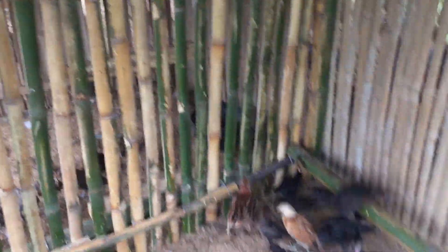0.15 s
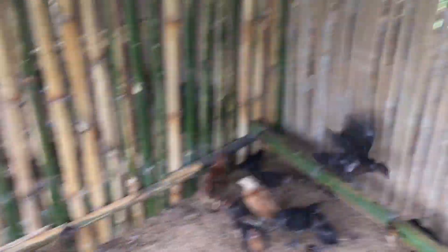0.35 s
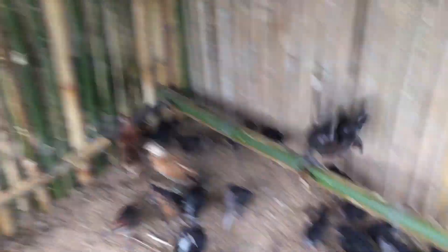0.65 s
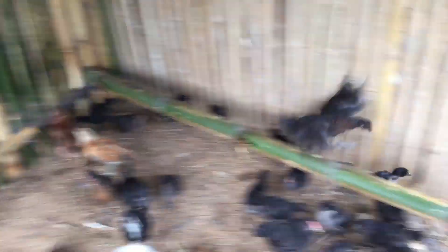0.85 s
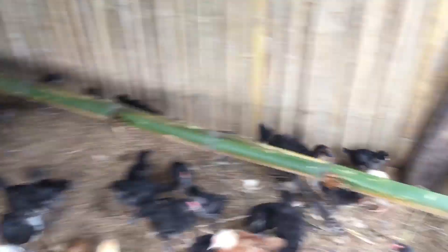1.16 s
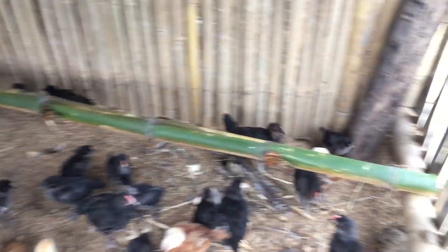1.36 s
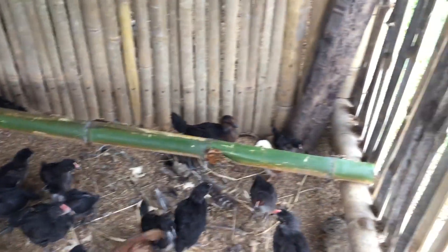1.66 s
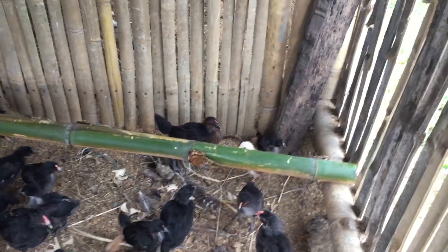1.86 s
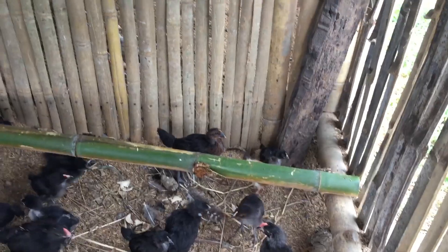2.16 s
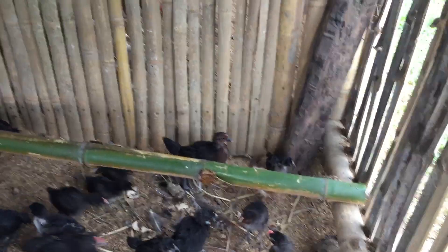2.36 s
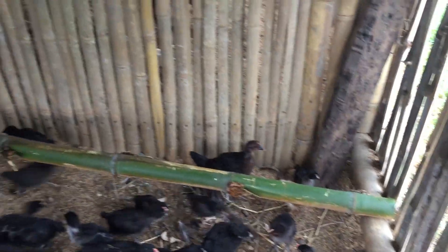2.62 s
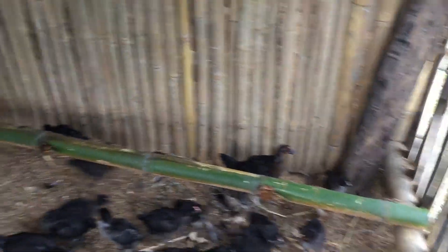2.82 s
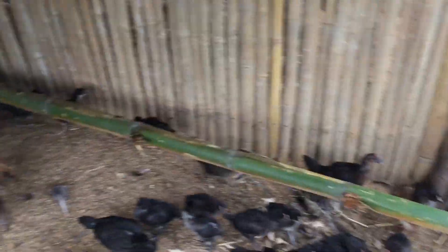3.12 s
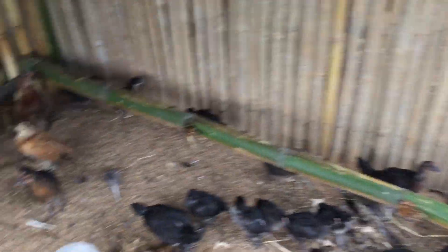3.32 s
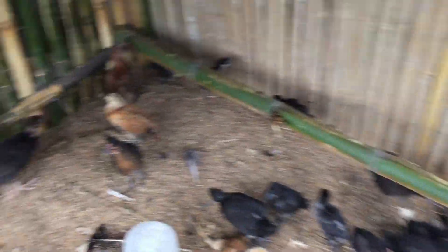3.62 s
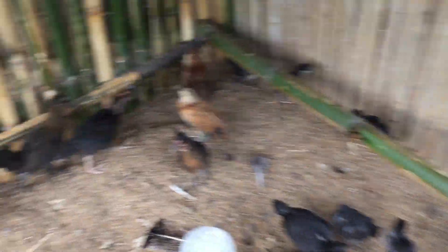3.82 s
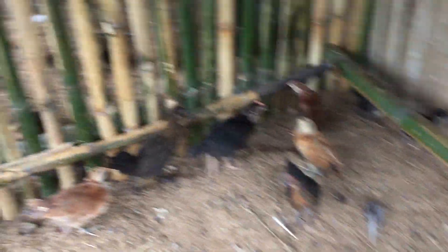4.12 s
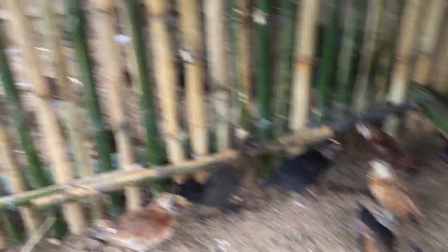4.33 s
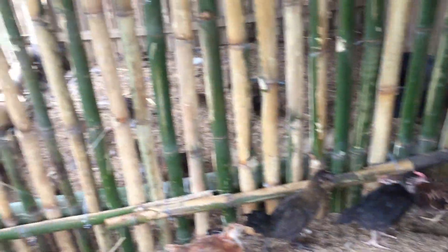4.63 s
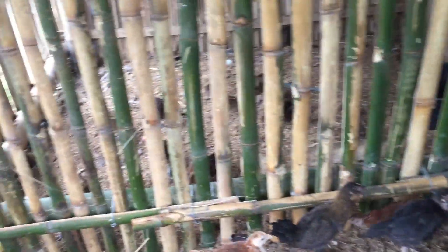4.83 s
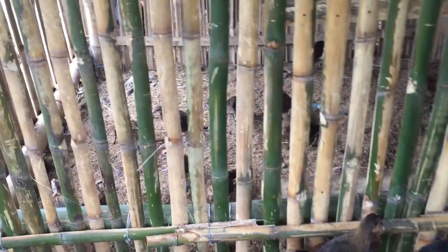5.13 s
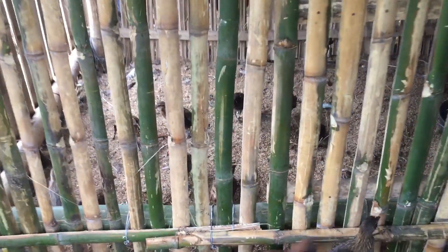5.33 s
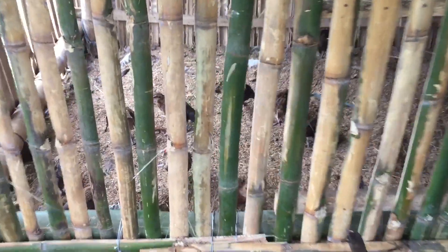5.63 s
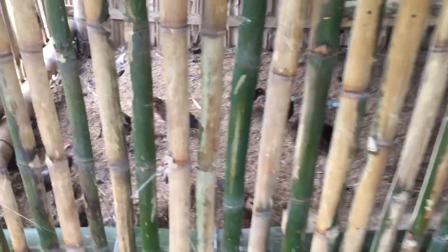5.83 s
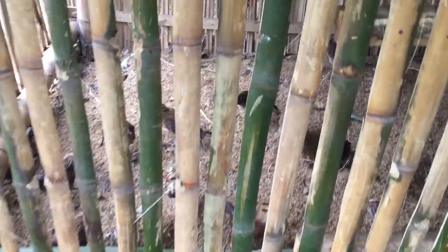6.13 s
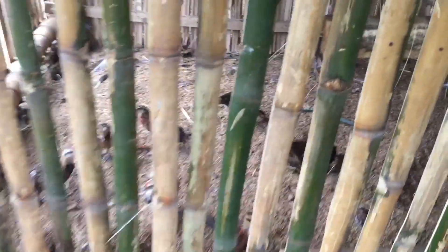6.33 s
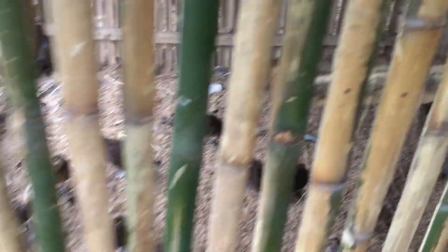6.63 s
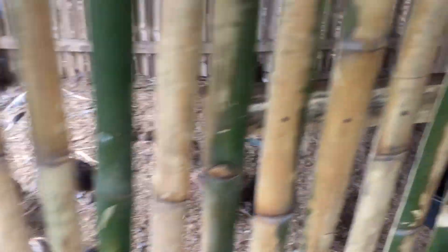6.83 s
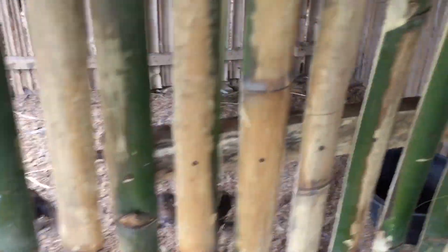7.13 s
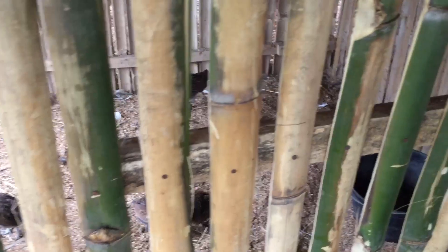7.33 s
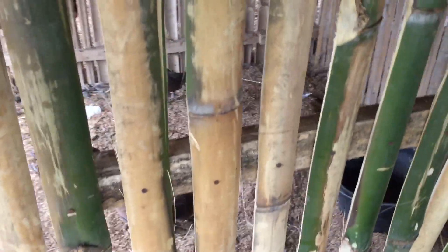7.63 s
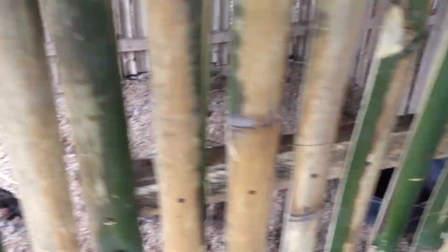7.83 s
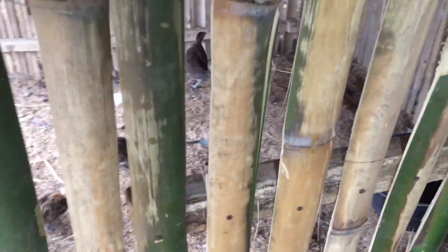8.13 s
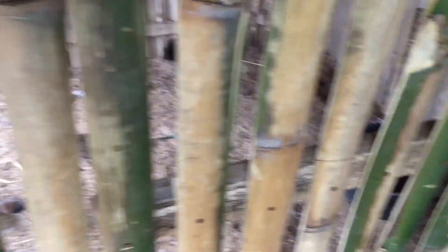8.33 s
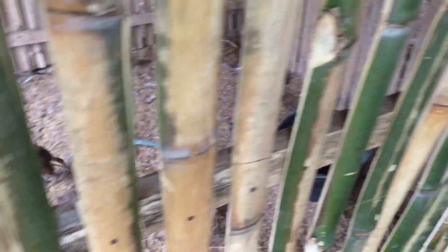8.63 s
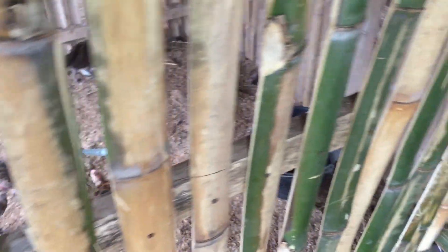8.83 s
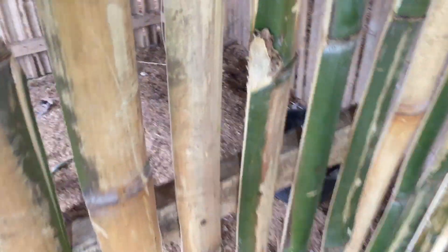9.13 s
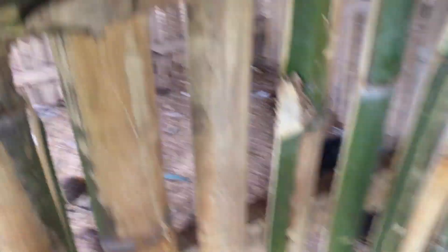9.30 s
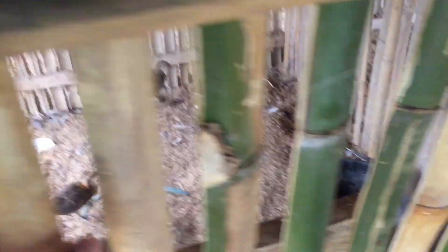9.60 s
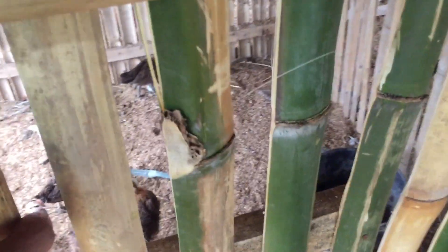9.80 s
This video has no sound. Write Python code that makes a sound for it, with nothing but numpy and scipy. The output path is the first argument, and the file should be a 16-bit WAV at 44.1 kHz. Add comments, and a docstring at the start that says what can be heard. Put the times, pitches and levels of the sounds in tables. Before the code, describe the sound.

Dense overlapping chick peeps, an early wing flutter with dry bamboo knocks, soft hen clucks and whine, then a raspy squawk that hushes the brood.

```python
"""A brood of chicks peeps in a bamboo coop with only brief pauses, over a low rumble and a thin hiss.
At the start one bird flutters down in puffs of noise; claws and beaks knock on bamboo, litter crackles.
Hens murmur, whine and cluck along: buzzing harmonics shaped by a throat, or one thin line.
From about 8.7 s a hen gives a long hoarse squawk, a clear tone with a rattling rasp, and the brood hushes.
Each peep is a near-pure whistle that falls in pitch; two loud ones end with a low blip at half pitch."""
import sys
import numpy as np
from scipy import signal
from scipy.fft import rfft, irfft, next_fast_len
from scipy.io import wavfile
from scipy.ndimage import uniform_filter1d, map_coordinates

SR = 44100
rng = np.random.default_rng(int(sys.argv[2]) if len(sys.argv) > 2 else 0)


def store_pcm(level_fs):
    """Save levels as 16-bit WAV."""
    pcm = np.round(np.clip(level_fs, -1, 1) * 32767).astype(np.int16)
    wavfile.write(sys.argv[1], SR, np.atleast_2d(pcm).T)


N = 439236
TIME = np.arange(N) / SR


def from_db(db):
    """Turn decibels into a plain multiplier."""
    return 10 ** (np.asarray(db) / 20)


def rms_one(x):
    """Scale a sound to an average strength (rms) of 1."""
    return x / np.sqrt(np.mean(x ** 2) + 1e-20)


def in_time(rows):
    """Columns of a curve, read at every sample."""
    s, *columns = np.transpose(rows)
    return [np.interp(TIME, s, c) for c in columns]


def during(rows, fade):
    """One inside the time span of a curve, fading at both ends over fade seconds."""
    return np.clip(np.minimum(TIME - rows[0][0], rows[-1][0] - TIME) / fade, 0, 1)


def add(out, s, sound):
    """Mix a sound in at time s."""
    at = int(np.clip(s * SR, 0, N))
    out[at:at + len(sound)] += sound[:N - at]


def drift(rate, size):
    """Smooth random wandering with spread about 1: rate random points a second, joined by lines."""
    at = np.arange(size) * rate / SR
    points = rng.standard_normal(int(at[-1]) + 3)
    return map_coordinates(points, [at + rng.random()], order=1, mode="nearest") * np.sqrt(3 / 2)


def colour(x, spectrum):
    """Shape a sound by (frequency [Hz], level [dB]) points, falling steeply beyond both ends; rms 1."""
    size = next_fast_len(len(x))
    octave = np.log2(np.arange(size // 2 + 1) * SR / size + 1)
    hz, db = np.transpose(spectrum)
    outside = np.abs(octave - np.clip(octave, np.log2(hz[0]), np.log2(hz[-1])))
    gain_db = np.interp(octave, np.log2(hz), db) - 98 * outside  # 98 dB per octave beyond the ends
    return rms_one(irfft(rfft(x, size) * from_db(gain_db), size)[:len(x)])


def noise(spectrum, size):
    """Coloured noise, rms 1."""
    return colour(rng.standard_normal(size), spectrum)


def phase_of(hz):
    """Add up a changing frequency into the phase of a wave."""
    return 2 * np.pi * np.cumsum(hz) / SR


def swell(u, top):
    """Rises to its height at share top of a note, then falls; rms 1."""
    return rms_one(np.sin(np.pi * np.interp(u, [0, np.clip(top, .08, .92), 1], [0, .5, 1])))


def coop(x, echo_db, tail_db, t60=0.26, count=8):
    """A few early echoes from the ground and slats, then a short scattered tail."""
    t = TIME[:SR // 2]
    echoes = np.zeros(len(t))
    echo_at = (rng.uniform(.002, .022, count) * SR).astype(int)
    echoes[echo_at] = rng.choice([-1, 1], count) / np.sqrt(count)
    tail = rng.standard_normal(len(t)) * from_db(-60 * t / t60) * np.clip(t / 0.0016, 0, 1)
    response = from_db(echo_db) * echoes + from_db(tail_db) * tail / np.linalg.norm(tail)
    return x + signal.fftconvolve(x, response)[:N]


def background():
    """Low rumble with a wavering hum, broad hiss that comes and goes, and a narrow hiss high up."""
    # sound colour of the rumble: (frequency [Hz], level [dB])
    rumble_colour = [(25, -25), (54, 0), (102, 1.5), (145, -6), (253, -26.5), (420, -37)]
    # strength of the rumble: (time [s], level [dB])
    rumble_db = [(0, -43), (2.1, -47), (3.2, -43.5), (5.7, -47.5), (9.96, -45.5)]
    # sound colour of the broad hiss: (frequency [Hz], level [dB])
    air_colour = [(300,-2.5), (600,3), (1200,0), (2000,-3), (5000,7), (7500,-6), (9500,4.5), (10400,-8),
                  (11300,8), (12500,-2.5), (15700,-5)]
    # rise and fall of the broad hiss, before a 13 dB lift: (time [s], level [dB])
    air_db = [(0,-69), (2.3,-75.5), (5,-73), (7.7,-71.5)]
    # strength of the narrow hiss near 11 kHz: (time [s], level [dB])
    high_db = [(0, -67), (3, -60.5), (4.5, -68), (8, -88)]
    rumble = from_db(in_time(rumble_db)[0]) * noise(rumble_colour, N)
    hum = from_db(-51.5) * np.sin(phase_of(91 + 1.726 * drift(5.2, N)))
    hum = hum * (1 + 0.47 * drift(1.44, N))
    air = from_db(in_time(air_db)[0] + 13 + 2.3 * drift(7, N)) * noise(air_colour, N)
    high_colour = [(10300, -15), (10900, -2), (11250, 5), (11700, -6), (12600, -53)]
    high = from_db(in_time(high_db)[0]) * noise(high_colour, N)
    return rumble + hum + air + high


def litter(patchy_db=-1.0, grain_db=6.0):
    """Many small feet stir the dry litter: a faint crackle that comes and goes."""
    # sound colour of the dry litter: (frequency [Hz], level [dB])
    litter_colour = [(2000,3), (5000,-18), (7000,-6), (9500,3), (15000,-0.5)]
    # how strongly it is stirred: (time [s], level [dB])
    litter_db = [(0,-70), (1.2,-63), (2.4,-75), (3.5,-68), (5.0,-84), (5.9,-66), (7.7,-61), (8.3,-72)]
    grains = rng.standard_normal(N) * from_db(grain_db * drift(600, N))
    patches = from_db(patchy_db * drift(16, N))
    return from_db(in_time(litter_db)[0]) * rms_one(colour(grains, litter_colour) * patches)


def knocks(crack_t60=0.02, ring_t60=0.073, ring_db=-22):
    """Claws and beaks on bamboo: a dry crack with a short woody tail."""
    # the knocks: (time [s], level [dB])
    knock_list = [(0.376,-45), (0.484,-42), (.695,-40), (0.852,-36), (1.055,-29), (1.431,-47),
                  (7.183,-43.5), (9.813,-38)]
    # sound colour of struck bamboo: (frequency [Hz], level [dB])
    bamboo = [(450, -44), (900, 2), (1600, 4), (2400, -2), (4200, 7.5), (6000, 5), (9000, 9), (15000, -3)]
    out, t = np.zeros(N), TIME[:SR // 8]
    for s, db in knock_list:
        decay = from_db(-60 * t / crack_t60) + from_db(ring_db - 60 * t / ring_t60)
        add(out, s, from_db(db) * noise(bamboo, len(t)) * decay)
    return out


def flutter():
    """Wing beats and scuffs: each is a crackly puff of feathers and litter."""
    # wing beats and scuffs in the litter: (time [s], level [dB], length [s])
    flaps = [(0.293, -49, 0.018), (0.485, -47, 0.02), (0.573, -46, 0.048), (0.675, -51, 0.031),
             (0.82, -53, 0.078), (0.906, -45.5, 0.072), (1.075, -48.5, 0.04), (1.229, -53, 0.034)]
    # sound colour of the puffs: (frequency [Hz], level [dB])
    feathers = [(150, 12.5), (400, -2.5), (1000, -7.5), (2000, 0), (5000, -2), (9000, -3.5), (15000, -8)]
    out = np.zeros(N)
    for s, db, length in flaps:
        u = np.linspace(0, 1, int(length * SR))
        grains = rng.standard_normal(len(u)) * from_db(4.6 * drift(694, len(u)))
        add(out, s, from_db(db) * colour(grains, feathers) * swell(u, 0.22))
    return out


def chatter():
    """A far hen's short soft grainy notes, about nine a second, strongest in the second harmonic."""
    # the string of notes: (first time [s], last time [s], pitch [Hz], level [dB])
    note_string = (7.4, 8.7, 505, -62.5)
    first, last, hz, db = note_string
    pulses = np.sin(phase_of(9 + 5 * drift(12, N)))
    notes = np.sqrt(np.maximum(pulses + .5, 0)) * from_db(3 * drift(8, N))
    phase = phase_of(hz * (1 + 0.051 * drift(160, N)))
    voice = np.sin(2 * phase) + from_db(-25) * np.sin(phase) + from_db(-11.5) * np.sin(3 * phase)
    grainy_level = from_db(db + 2.1 * drift(70, N))
    return grainy_level * notes * during([[first], [last]], 0.013) * voice


def syrinx(hz, rough, jitter, rasp, count):
    """Harmonics of an unsteady membrane, with air noise let through on every cycle."""
    phase = phase_of(hz * (1 + jitter * rough * drift(500, len(hz))))
    buzz = rms_one(sum(np.cos(k * phase) for k in range(1, count + 1)))
    air = rng.standard_normal(len(hz)) * (1 + np.cos(phase))
    return buzz + rasp * rough * air


def clucks():
    """Short gruff pops with falling pitch."""
    # the clucks: (time [s], level [dB], length [s], pitch about mid-note [Hz])
    cluck_list = [(3.595,-56,0.037,357), (3.919,-41,0.036,304.6), (4.191,-41.5,0.022,295.7),
                  (4.333,-43,0.022,319.6), (4.495,-49,0.032,322), (4.856,-50.5,0.051,302.6),
                  (8.061,-58,0.03,291), (9.704,-35,0.035,600), (9.803,-50.5,0.094,226.7)]
    # throat with the beak nearly shut: (frequency [Hz], level [dB])
    cluck_throat = [(200, -34.5), (400, -5), (600, 3), (900, -6.5), (1300, -14.5), (2000, -11), (3500, -30)]
    out = np.zeros(N)
    for s, db, length, hz in cluck_list:
        u = np.linspace(0, 1, int(length * SR))
        buzz = syrinx(hz * (1.1 - 0.163 * u), 0.805, jitter=0.106, rasp=2.16, count=10)
        add(out, s, from_db(db) * colour(buzz, cluck_throat) * swell(u, 0.39))
    return out


def whine():
    """A hen's one thin line that shakes in pitch and strength, steadiest where it is loudest."""
    # the held whine, before a 3.5 dB lift: (time [s], pitch [Hz], level [dB])
    whine_line = [(3.35, 1420, -76), (3.5, 1433, -63.5), (4.05, 1398, -56), (4.38, 1454, -54),
                  (4.47, 1487, -46), (4.58, 1488, -42.5), (4.68, 1420, -46.5), (5.04, 1442, -47),
                  (5.12, 1400, -67)]
    hz, db = in_time(whine_line)
    shake = np.interp(TIME, [3.9, 4.5, 4.6, 4.7], [1, .15, .15, .7])
    line = np.sin(phase_of(hz * (1 + .03 * shake * drift(220, N))))
    line = line * from_db(4 * shake * drift(70, N))
    return from_db(db + 3.5) * during(whine_line, 0.029) * line


def murmurs():
    """Quiet, arched, wavering hen notes, clear or gruff and pulsing; also two low blips under peeps."""
    # the notes: (start [s], end [s], start pitch [Hz], end pitch [Hz], level [dB],
    # roughness [0 = clear, about 1 = gruff]);
    # the rows at 5.811 and 6.333 s are no hen: low blips at half pitch as loud peeps end
    murmur_list = [(0.256,0.326,713,686,-50.5,0.9), (0.615,0.636,590,550,-45,0.25),
                   (0.855,0.875,416,396,-47.5,0.54), (1.279,1.5,497,436,-59.5,0.39),
                   (1.452,1.56,569,543,-53.5,0.62), (1.671,1.806,566,508,-55.5,0.67),
                   (1.94,2.04,504,534,-55,1.4), (2.041,2.201,517,550,-50.5,0.58),
                   (2.689,3.092,644,654,-67.5,0.26), (2.823,3.127,442,423,-65,0.24),
                   (3.19,3.22,450,440,-61,.25), (3.269,3.298,460,438,-59,0.37),
                   (3.996,4.059,459,455,-46,0.24), (5.07,5.147,492,423,-42.5,0.25),
                   (5.193,5.31,494,480,-56,1.44), (5.811,5.824,587,495,-53,0),
                   (6.333,6.35,580,526,-59.5,0.1)]
    # throat of a clear note: (frequency [Hz], level [dB])
    clear_throat = [(480,-25), (750,8.5), (1000,17), (1350,-11), (1700,2.5), (2100,-17)]
    # throat of a gruff note: (frequency [Hz], level [dB])
    gruff_throat = [(420,-14), (550,10), (800,6), (1050,11), (1250,13), (1450,11.5), (1700,3), (2000,-24)]
    arch_share, waver_share = 0.029, 0.0162  # mid-note rise and unsteadiness, as shares of the pitch
    pulses_per_s, pulse_db = 47.3, 4.5  # pulse depth is for roughness 1
    out = np.zeros(N)
    for start, end, first_hz, last_hz, db, rough in murmur_list:
        u = np.linspace(0, 1, int(max(end - start, .02) * SR))
        arch = arch_share * (np.sin(np.pi * u) - .5)
        hz = (first_hz + (last_hz - first_hz) * u) * (1 + arch + waver_share * drift(29.2, len(u)))
        buzz = syrinx(hz, rough, jitter=.06, rasp=.8, count=6)
        gruff = np.clip((rough - .3) / .4, 0, 1)
        voice = (1 - gruff) * colour(buzz, clear_throat) + gruff * colour(buzz, gruff_throat)
        pulses = np.sin(phase_of(pulses_per_s * (1 + .3 * drift(40, len(u)))))
        grain = from_db(rough * pulse_db * pulses + 4 * drift(30, len(u)))
        shape = rms_one(np.sqrt(np.abs(swell(u, 0.75))))
        add(out, start, from_db(db) * rms_one(voice * grain) * shape)
    return out


def effort_db(t, start_s, release_s, db, attack, rise_db, tiring, release):
    """Level of the squawk: it sets in, holds while it may slowly tire, and dies away."""
    since = t - start_s
    rise = rise_db * np.maximum(1 - since / attack, 0)
    return db - rise - tiring * since - release * np.maximum(t - release_s, 0)


def squawk():
    """A strong second harmonic over hoarse upper ones that clear, then roughen again at the end."""
    # pitch of the squawk: (time [s], pitch [Hz])
    squawk_pitch = [(8.77, 470), (8.81, 495), (8.85, 545), (8.91, 580), (9.0, 585), (9.15, 560),
                    (9.35, 542), (9.55, 500), (9.72, 425), (9.79, 362)]
    # clear tone: (level [dB], attack [s], rise in the attack [dB], tiring [dB/s], release [dB/s])
    tone_effort = (-27.9, .16, 27, 0, 260)
    # rasp: (level [dB], attack [s], rise in the attack [dB], tiring [dB/s], release [dB/s])
    rasp_effort = (-29.6, .14, 12, 4.5, 170)
    # the voice breaks and leaves mostly rasp: (time [s], half length [s], loss of tone [dB])
    voice_breaks = [(8.897, 0.02, 24), (8.996, 0.03, 6), (9.132, 0.02, 20), (9.243, 0.011, 20),
                    (9.395, .024, 18), (9.55, 0.1, 8.5)]
    # throat with the beak wide open: (frequency [Hz], level [dB])
    open_throat = [(380,-20), (500,-16), (630,9.5), (850,-2.5), (1150,4), (1380,-4), (1700,0), (1900,9.5),
                   (2150,13.5), (2550,-5), (2900,-7.5), (3550,-30), (4000,-12), (5000,-15), (5600,-10.5),
                   (6400,-10), (6950,-18.5), (8500,-18), (15000,-32)]
    # throat with the beak closing: (frequency [Hz], level [dB])
    closing_throat = [(330,-16), (470,3), (620,9.5), (850,2), (1150,5), (1500,0), (1950,1), (2550,-7.5),
                      (2850,-19), (3380,-17), (3800,-13), (4980,-20), (5500,-14.5), (6300,-12.5),
                      (7200,-23), (9800,-24.5), (15000,-28)]
    # the beak closes between: (start [s], end [s])
    beak_closing = (9.01, 9.32)
    start_s, release_s, end_s = 8.695, 9.735, 9.89
    tone_flutter_db, tone_flutter_per_s = 2.8, 45
    rasp_flutter_db, rasp_flutter_per_s = 1.2, 70

    on = during([[start_s], [end_s]], 0.03)
    live, out = on > 0, np.zeros(N)
    hz, t, size = in_time(squawk_pitch)[0][live], TIME[live], live.sum()
    tone_db = effort_db(t, start_s, release_s, *tone_effort)
    tone_db = tone_db + tone_flutter_db * np.tanh(drift(tone_flutter_per_s, size))
    tone_db = tone_db - sum(db * np.exp(-((t - s) / half) ** 2) for s, half, db in voice_breaks)
    rasp_db = effort_db(t, start_s, release_s, *rasp_effort)
    rasp_db = rasp_db + rasp_flutter_db * drift(rasp_flutter_per_s, size)
    rough = np.interp(t, [8.8, 9.35, 9.55, 9.68, 9.73], [1.0, .9, .68, .72, 1.1])
    jitter = rough * (.010 * drift(260, size) + .028 * drift(1500, size))
    phase = phase_of(hz * (1 + jitter))
    # the membrane rattles: every harmonic wanders in strength and phase on its own
    buzz = np.zeros(size)
    for k in range(1, 22):
        strength = min(k / 2, 1) ** 2 * from_db(2.5 * drift(90, size))
        wander = 2 * np.pi * rng.random() + 1.1 * rough * drift(170, size)
        buzz += strength * np.cos(k * phase + wander)
    # strong and weak cycles alternate, filling the gaps between the harmonics
    buzz = rms_one(buzz) * (1 + rough * np.tanh(drift(140, size)) * np.cos(phase / 2))
    source = buzz + .4 * rough * rng.standard_normal(size)  # with rushing air
    # as the beak closes, one throat colour blends into the other
    closing = np.interp(t, beak_closing, [0, 1])
    voice = (1 - closing) * colour(source, open_throat) + closing * colour(source, closing_throat)
    # the push of air is even, however the membrane rattles
    voice = voice / np.sqrt(uniform_filter1d(voice ** 2, size=500) + 1e-9)
    # the part above 7 kHz grows at first, then fades towards the end
    dull = signal.sosfiltfilt(signal.butter(6, 7000, fs=SR, output="sos"), voice)
    voice = dull + (voice - dull) * np.interp(t, [8.75, 8.9, 9.65], [.5, 1.2, .5])
    tone = np.sqrt(2) * np.sin(2 * phase) * from_db(1.3 * drift(90, size))
    out[live] = from_db(tone_db) * tone + from_db(rasp_db) * voice
    return out * on


def brood_gain():
    """The brood calls more or less busily, pauses now and then, and hushes at the squawk."""
    # how busy the brood is: (time [s], level [dB])
    busy = [(0.0, -49.5), (0.55, -54), (0.68, -43.5), (0.97, -49.5), (1.72, -42), (1.87, -54), (2.6, -48),
            (4.1, -41.5), (5.16, -43.5), (5.47, -42.5), (6.08, -44.5), (6.3, -38.5), (7.7, -43.5),
            (8.7, -43.5)]
    # brief pauses: (time [s], half length [s])
    lulls = [(1.383, 0.12), (2.315, 0.2), (5.09, 0.1), (6.394, 0.082), (6.891, 0.045)]
    lull_db, hush_s, hush_db_per_s = 11.5, 8.81, 18
    lull = sum(np.exp(-((TIME - s) / half) ** 2) for s, half in lulls)
    hush = hush_db_per_s * np.maximum(TIME - hush_s, 0)
    return from_db(in_time(busy)[0] - lull_db * lull - hush)


def peep(length, first_hz, last_hz, bend, bright_db):
    """A near-pure whistle that eases in, glides down with small kinks and a quiver, and drops off."""
    # a chick's throat, as it passes the overtones: (frequency [Hz], level [dB])
    overtone_throat = [(4500, -18), (6200, -28), (7400, -33), (9500, -31.5), (11000, -39)]
    hook_share, hook_s = .06, .012  # a peep that hangs first scoops up into its pitch
    drop_share, drop_s = 0.09, 0.00618  # the pitch dips as the peep ends
    wander, wander_per_s = 0.0351, 59.9  # kinks in the glide, as a share of its fall
    quiver_share, flutter_db = 0.0056, 3  # unsteadiness of the pitch and of the strength
    attack_s, release_s = .012, .004
    u = np.linspace(0, 1, int(max(length, .018) * SR))
    t = u * length
    hook = hook_share * np.clip(bend - 1, 0, 1) * np.exp(-t / hook_s)
    drop = drop_share * np.exp((t - length) / drop_s)
    glide = u ** max(bend, .2) + wander * drift(wander_per_s, len(u))
    hz = first_hz * (last_hz / first_hz) ** glide * (1 - hook - drop)
    phase = phase_of(hz * (1 + quiver_share * drift(200.0, len(u))))
    overtones = np.zeros(len(u))
    for k in (2, 3):
        throat_db = np.interp(k * hz, *np.transpose(overtone_throat))
        overtone_db = throat_db + bright_db - 5 * (k - 2) + 4 * drift(35, len(u))
        overtones += from_db(overtone_db) * np.sin(k * phase)
    # loudest three quarters of the way through
    loudness = np.abs(swell(u, 0.75)) ** 0.2 * from_db(flutter_db * drift(147.0, len(u)))
    edges = np.clip(np.minimum(t / attack_s, (length - t) / release_s), 0, 1)
    loudness = loudness * np.sin(np.pi / 2 * edges)
    return rms_one(loudness) * (np.sin(phase) + overtones) * np.sqrt(2)


def thin_peeps(count=56):
    """Softer, higher and longer peeps that cross the others."""
    out = np.zeros(N)
    for k, (when, length, high, low) in enumerate(rng.random((count, 4))):
        call = peep(.07 + .08 * length, 4100 + 750 * high, 2900 + 900 * low, 1.5, bright_db=13.5)
        add(out, (k + when) / count * TIME[-1], call)
    return from_db(-9) * rms_one(out) * brood_gain()


def far_chicks(count=350):
    """The rest of the brood: the same falling peep, at random moments, pitches and strengths."""
    spread_db = 7  # far peeps differ by up to twice this in strength
    out = np.zeros(N)
    for k, (when, length, high, fall, size, bend) in enumerate(rng.random((count, 6))):
        first_hz = 3350 + 1400 * high
        last_hz = 2480 + (first_hz - 2900) * .7 * fall
        call = peep(.024 + .05 * length, first_hz, last_hz, .6 + bend, bright_db=5)
        add(out, (k + when) / count * TIME[-1], from_db(spread_db * 2 * size) * call)
    return rms_one(out) * brood_gain()


def near_chicks():
    """The chicks close by, peep after peep."""
    # the loudest peeps: (time [s], length [s], start pitch [Hz], end pitch [Hz], level [dB],
    # bend [over 1 hangs before it falls, under 1 drops at once])
    peep_list = [(.03,0.054,3890,3210,-42.5,1), (0.049,0.081,4320,3470,-48,1.5),
                 (.14,0.038,4900,4100,-49,1), (.175,0.027,3810,3030,-46,.7), (.187,0.044,4200,3200,-48,.9),
                 (.28,0.028,3190,2380,-49.5,.8), (.35,.13,3600,2690,-52,0.52),
                 (0.406,0.026,3600,3180,-40.5,0.95), (0.485,.11,3550,2730,-40,0.6),
                 (0.616,0.016,2430,2330,-37,0.9), (0.691,0.031,3480,2630,-44.5,0.92),
                 (.68,0.091,4300,3480,-44.5,2.4), (.745,0.082,3620,2770,-38,1.46),
                 (.94,0.029,4050,2130,-34.5,1.38), (1.098,0.029,3690,2560,-33,1.44),
                 (1.187,0.029,3380,2990,-36,.7), (1.261,0.063,4640,3300,-44,1.4),
                 (1.303,0.047,3090,2780,-39,0.51), (1.332,0.18,4750,3610,-49.5,1.07),
                 (1.464,0.094,3990,3010,-42,1.03), (1.583,0.031,3170,2520,-37.5,1.04),
                 (1.61,0.059,3880,3280,-40,1.7), (1.621,0.062,3240,2720,-32.5,1.16),
                 (1.745,0.084,3580,2636,-37,0.81), (1.785,.075,3930,3210,-42,1.3),
                 (1.933,0.029,3700,2770,-43.5,1.4), (1.962,0.034,3800,2890,-41,1.2),
                 (2.04,0.028,3570,2860,-41.5,.7), (2.025,0.16,5240,2690,-46,2.2),
                 (2.131,0.18,4125,3860,-46,2.9), (2.254,0.13,3570,2630,-42,2.5),
                 (2.445,0.029,3750,2670,-51.5,1.5), (2.462,0.15,5010,2890,-51,1.16),
                 (2.505,0.087,3830,2880,-47,0.95), (2.635,0.1,3720,3240,-36.5,0.6),
                 (2.623,0.1,3720,2390,-42.5,0.6), (2.744,0.085,3600,2695,-37.5,1.14),
                 (2.83,0.086,4800,3390,-47,2), (2.95,0.069,3330,2590,-37.5,2.1),
                 (3.08,.12,3750,2520,-41.5,1.53), (3.03,0.19,4180,3820,-47,1.23),
                 (3.28,0.032,3700,2950,-43.5,0.81), (3.325,0.043,4006,3590,-40,1.04),
                 (3.335,0.057,3580,2730,-47,0.71), (3.451,0.084,4860,2680,-43.5,1.6),
                 (3.515,0.11,3530,2720,-42,0.75), (3.679,0.078,3480,2615,-39.5,1.1),
                 (3.719,0.094,4640,3370,-41,1.4), (3.785,0.097,3390,2750,-37,1.17),
                 (3.927,0.041,3690,2700,-36.5,0.88), (3.951,0.051,4580,3540,-36.5,1.9),
                 (4.01,0.084,3810,2420,-36,0.93), (4.025,0.075,4180,2780,-42,0.97),
                 (4.08,0.15,4080,3950,-49,0.96), (4.121,0.034,3500,2860,-47,0.82),
                 (4.184,0.062,3770,2600,-42.5,0.84), (4.19,0.11,5400,3900,-50.5,2),
                 (4.279,.087,3880,3310,-40.5,1.6), (4.39,0.087,3850,2624,-35.5,1),
                 (4.501,0.07,3485,2490,-34,1.06), (4.781,0.052,3620,2690,-39,1),
                 (4.86,0.088,4156,3740,-38.5,1.2), (4.867,0.07,3615,2190,-33.5,0.84),
                 (4.97,0.067,3610,2340,-42,0.88), (5.101,0.04,3920,3030,-44,1.5),
                 (5.181,0.12,4586,2220,-39.5,2.27), (5.278,0.069,3040,2150,-37.5,1.07),
                 (5.33,0.13,3660,2450,-37.5,1.08), (5.365,0.075,4690,3080,-39.5,2.3),
                 (5.576,0.09,4130,3210,-41.5,1.6), (5.598,0.036,3115,2424,-43,0.75),
                 (5.69,0.036,3870,2270,-31,1.1), (5.733,0.091,4040,2050,-33,0.97),
                 (5.868,0.096,3610,2990,-38.5,1.3), (5.991,0.054,3950,2160,-44.5,0.99),
                 (6.06,0.1,4820,3100,-39,2.1), (6.075,0.032,3700,2710,-42.5,0.66),
                 (6.166,0.034,3400,2220,-34.5,0.66), (6.255,0.094,3340,2154,-33,0.7),
                 (6.306,0.064,4770,3100,-33.5,1.23), (6.453,0.054,3640,2960,-38,0.87),
                 (6.525,0.047,2970,2180,-40,1.25), (6.573,0.055,4110,2120,-33,1),
                 (6.781,0.054,3310,2080,-27.5,0.73), (6.954,0.093,3640,2620,-36.5,0.9),
                 (7.145,0.047,3550,2840,-36,1.33), (7.25,0.084,3940,2185,-31,0.96),
                 (7.263,0.06,3790,3330,-41,1.3), (7.51,0.11,3670,3003,-43,0.37),
                 (7.615,0.038,3280,2370,-41.5,0.93), (7.62,0.11,3650,3155,-38.5,1),
                 (7.725,0.039,3140,2550,-40,0.76), (7.745,0.051,3800,3400,-35,0.78),
                 (7.77,0.075,3060,2390,-45.5,0.58), (7.84,0.066,3800,3350,-41.5,0.73),
                 (7.92,0.049,3806,2160,-38,1.12), (7.965,0.055,4850,3750,-46.5,2.2),
                 (7.985,0.042,3710,2960,-47,0.65), (8.12,0.17,4540,3260,-40,1.04),
                 (8.24,0.052,3600,2414,-38.5,0.91), (8.265,0.08,4660,3350,-39,0.95),
                 (8.462,0.094,3340,2500,-28.5,1.19), (8.615,0.066,3860,3410,-40.5,0.82),
                 (8.674,0.052,2907,2490,-39.5,1.2), (8.721,0.051,3330,2920,-39,0.9),
                 (8.775,0.051,3700,2777,-36.5,1.27), (9.635,0.089,3680,2550,-41.5,0.97),
                 (9.731,0.088,4200,2580,-42,0.86)]
    # how openly the beaks face this way: (time [s], overtone gain [dB])
    facing = [(1.2, 2), (1.65, 9.5), (2.8, 11), (3.6, 7.5), (6.8, 1.5)]
    out = np.zeros(N)
    for s, length, first_hz, last_hz, db, bend in peep_list:
        bright_db = np.interp(s, *np.transpose(facing))
        add(out, s, from_db(db) * peep(length, first_hz, last_hz, bend, bright_db))
    return out


def scene():
    """Chicks, hens and movement in the coop, over the background; the squawking hen is driest."""
    movement = coop(flutter() + knocks() + litter(), echo_db=-10.5, tail_db=-5.5)
    # the murmurs bring the two low blips under peeps along
    hens = coop(murmurs() + whine() + clucks() + chatter(), echo_db=-12, tail_db=-12)
    hens = hens + coop(squawk(), echo_db=-18, tail_db=-17)
    chicks = coop(far_chicks() + thin_peeps(), echo_db=-5.5, tail_db=-8.5)
    chicks = chicks + from_db(-1.5) * coop(near_chicks(), echo_db=-6.0, tail_db=-13.5)
    return (chicks + hens + movement + background())[None]


def record(dry):
    """The top is cut steeply above 15.8 kHz."""
    return signal.sosfilt(signal.ellip(12, .1, 80, 15800, fs=SR, output="sos"), dry)


dry = scene()
out = record(dry)
store_pcm(out)
```